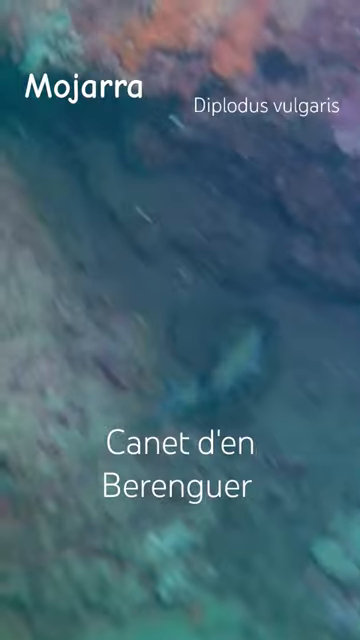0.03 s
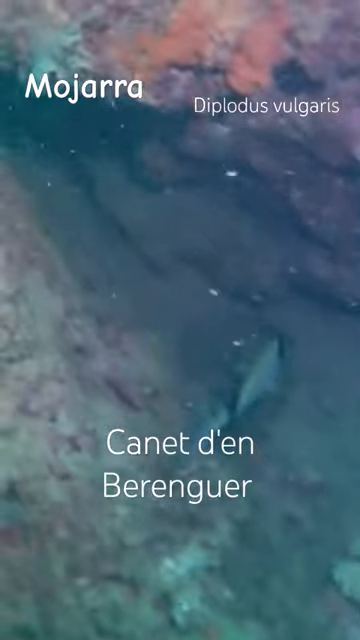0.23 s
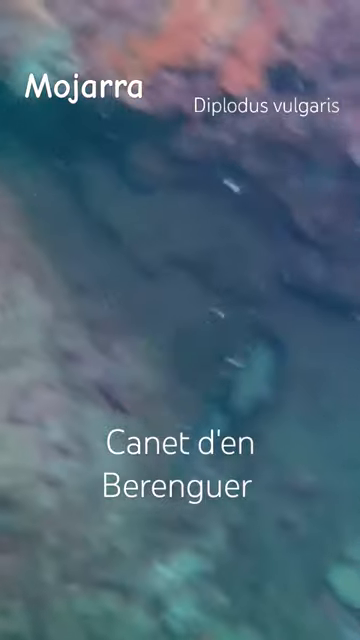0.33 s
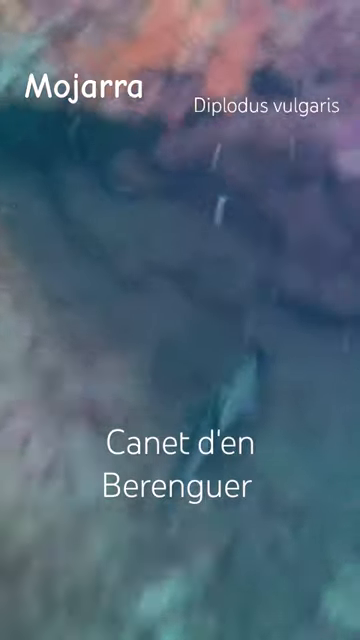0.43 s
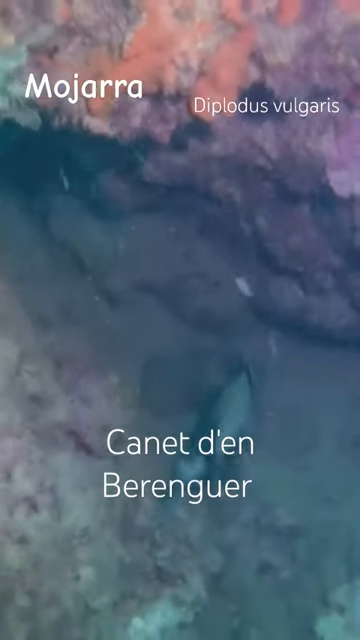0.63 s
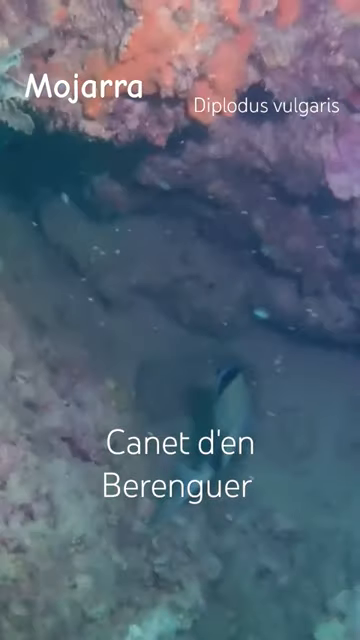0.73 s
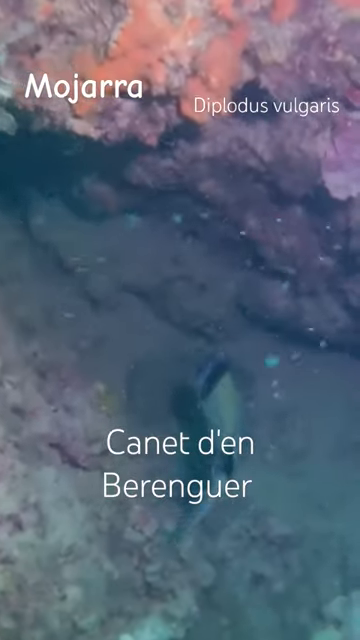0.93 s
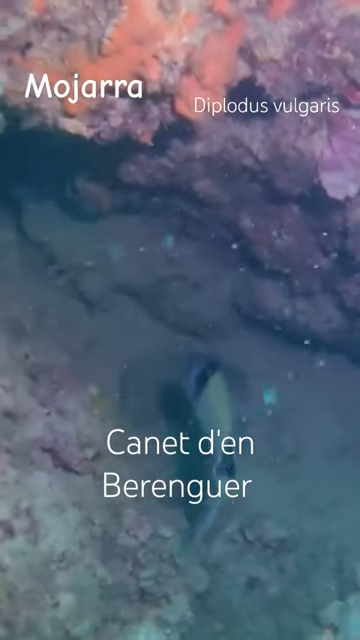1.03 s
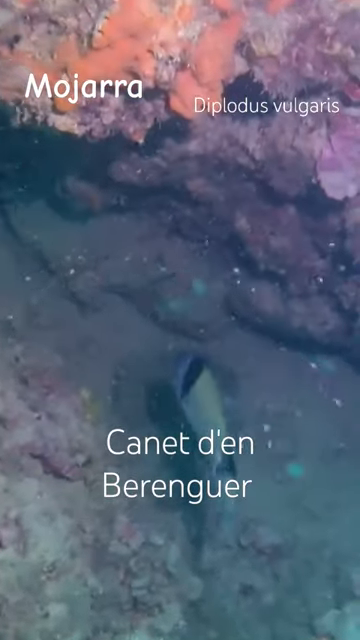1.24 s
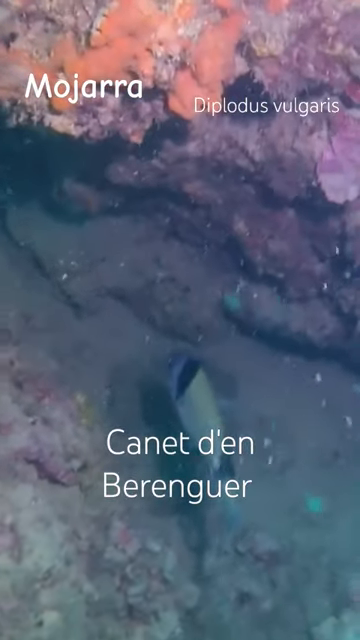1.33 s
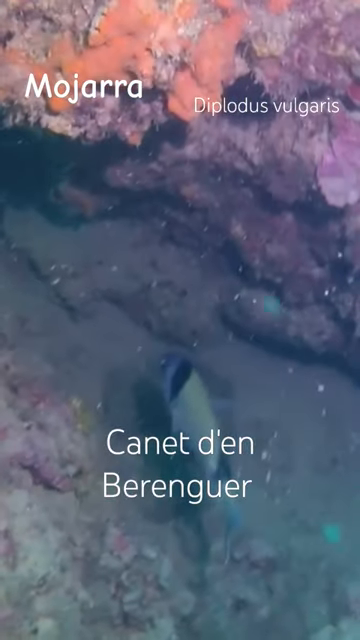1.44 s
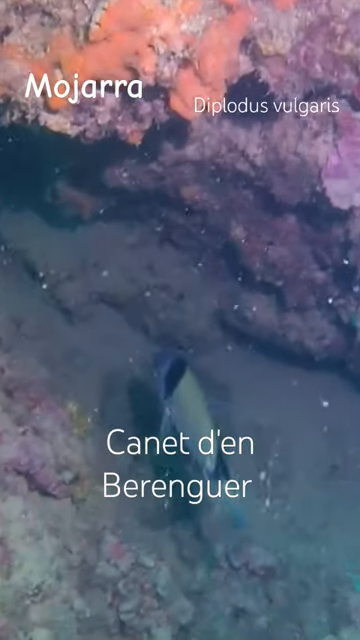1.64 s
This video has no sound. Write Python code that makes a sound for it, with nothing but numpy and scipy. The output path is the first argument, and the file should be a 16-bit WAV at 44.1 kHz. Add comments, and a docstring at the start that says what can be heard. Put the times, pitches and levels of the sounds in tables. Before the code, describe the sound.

Underwater rumble through a camera housing, microphone inside. Silence until 0.18 s, then a sharp click and a deep wavering hum, strongest near 0.5 s with a soft swish. Dull bumps and gurgles at 0.58 s, a bright bubble pop at 0.8 s. The hum fades over faint wash, distant crackle and even ticking; from 1.4 s bumps, gurgles and pops cluster, thinning toward the end.

```python
"""A small camera in a plastic housing is carried through sea water near rocks.
After a short silence the sound opens with a sharp click. The housing sways on its grip with a deep hum (a slow
sine), fingers bump it (short pushes), and water and distant reef crackle ring its shell (filtered noise and clicks).
Trapped air gurgles (wavering tones), small bubbles pop and ping beside the microphone (dying rings), and one soft
swish comes at half a second. Then something ticks faintly and evenly, and later bumps, gurgles and pops thicken again."""
import sys
import numpy as np
from scipy import signal
from scipy.io import wavfile
from scipy.ndimage import uniform_filter1d

SR = 44100
rng = np.random.default_rng(int(sys.argv[2]) if len(sys.argv) > 2 else 0)


def voltage_ratio(decibels):
    """Convert decibels (scalar or array-like) to amplitude ratios, 20 dB per decade."""
    exponent = np.asarray(decibels, float) / 20
    return 10 ** exponent


def dump(signal):
    """Clip the signal to [-1, 1] and save it as 16-bit WAV at the path in sys.argv[1]."""
    limited = np.clip(np.atleast_2d(signal).T, -1, 1)
    pcm = np.round(limited * 32767).astype(np.int16)
    wavfile.write(sys.argv[1], SR, pcm)


N = 74970  # length in samples
START_S = .1838  # silence before this, in seconds


def evened(x):
    """Scales a signal to an rms (average strength) of 1."""
    return x / np.sqrt(np.mean(x ** 2) + 1e-20)


def smoothed(x, span):
    """Averages twice over span samples, leaving only slow changes, and scales to rms 1."""
    once = uniform_filter1d(x, size=span)
    return evened(uniform_filter1d(once, size=span))


def over_time(rows, t):
    """Reads a curve drawn as (seconds, value) points."""
    return np.interp(t, *np.transpose(rows))


def over_hz(points, hz):
    """Reads a spectrum drawn as (Hz, dB) points, with pitch on a log axis."""
    f, value = np.transpose(points)
    return np.interp(np.log(hz + 1), np.log(f + 1), value, left=-90, right=-120)


def coloured(x, points):
    """Filters by a spectrum, with a response that only rings after its cause (minimum phase)."""
    hz = abs(np.fft.fftfreq(8192, 1 / SR))
    log_gain = np.log(voltage_ratio(over_hz(points, hz)))
    response = np.exp(np.conj(signal.hilbert(log_gain)))
    taps = np.fft.ifft(response).real[:4096]
    return signal.oaconvolve(x, taps)[:N]


def placed(rows, voice):
    """Makes one sound per table row and mixes each in at its own time."""
    mix = np.zeros(N)
    for row in rows:
        s, sound = voice(*row)
        part = mix[round(s * SR):][:len(sound)]
        part += sound[:len(part)]
    return mix


def sway(t):
    """The whole housing swings on its grip: a pure, low tone of changing pitch and level."""
    # Each row: time in seconds, level in dB rms.
    swing_level = [(.19, -15.5), (.23, -14), (.30, -19), (.385, -17.5), (.42, -32), (.45, -24),
                   (.50, -10.5), (.55, -17.5), (.61, -14), (.68, -21), (.74, -27), (.9, -32.5), (1.03, -43),
                   (1.098, -35), (1.4, -39.5), (1.55, -33.5), (1.7, -41)]
    # Each row: time in seconds, swing rate in Hz.
    swing_rate = [(.18, 30.9), (.39, 27.95), (.42, 36.4), (.465, 37.3), (.49, 22.3), (.54, 26.6),
                  (.57, 29.83), (.8, 29.74), (1.7, 28.66)]
    turns = np.cumsum(over_time(swing_rate, t) * (t >= START_S)) / SR
    return np.sqrt(2) * voltage_ratio(over_time(swing_level, t)) * np.cos(2 * np.pi * turns)


def bump(s, peak_db, width):
    """A push in one direction, with a shallow rebound on either side; the narrower, the sharper."""
    u = np.arange(-4 * width, 4 * width, 1 / SR) / width
    return s - 4 * width, voltage_ratio(peak_db) * (1 - 0.17 * u ** 2) * np.exp(-.5 * u ** 2)


def click_and_bumps():
    """A sharp click as the sound opens, then a few dull bumps on the housing."""
    # The first two rows make the click. Each row: time of the peak in seconds, peak level in dB, width in seconds.
    pushes = [(.1838, -24, 0.000047), (.1845, -24.5, 0.00023), (.582, -19, 0.0015), (.587, -18, 0.00085),
              (1.388, -20, 0.00037), (1.4105, -13, 0.00069)]
    return placed(pushes, bump)


def gurgle(s, peak_db, hz, length):
    """Trapped air wobbles: a short tone that starts fast, holds, wavers unevenly and dies."""
    wobble, lumpiness = .025, .15  # largest swing of the pitch and of the level, as fractions
    t = np.arange(0, length, 1 / SR)
    cycles = np.array([[1.3], [2.4]])  # per gurgle: pitch, then level
    waver, lumps = np.sin(2 * np.pi * (t / length * cycles + rng.random((2, 1))))
    shape = np.sin(np.pi * (t / length) ** 0.56) ** 0.49 * (1 + lumpiness * lumps)
    turns = np.cumsum(hz * (1 + wobble * waver)) / SR
    return s, voltage_ratio(peak_db) * shape * np.sin(2 * np.pi * turns)


def gurgles():
    """Pockets of trapped air sound at their own times as low wobbles."""
    # Each row: start in seconds, peak level in dB before the lumps, middle pitch in Hz, length in seconds.
    air_wobbles = [(.19, -39, 134, 0.073), (.218, -35, 1175, 0.0039), (.2185, -31.5, 718, 0.012),
                   (.577, -23.5, 463, 0.016), (.584, -26.5, 667, 0.0067), (.604, -34, 766, 0.0074),
                   (.765, -31.5, 165, 0.085), (.7805, -28, 737, 0.013), (.796, -22.5, 751, 0.016),
                   (1.30, -41, 168, 0.028), (1.502, -49, 1455, 0.042), (1.416, -35, 910, 0.0104),
                   (1.38, -29, 171, 0.032), (1.385, -29, 532, 0.008), (1.411, -33, 363, 0.038),
                   (1.412, -35, 830, 0.0052), (1.427, -24.5, 690, 0.0081), (1.437, -27, 820, 0.0072),
                   (1.435, -42.5, 1122, 0.026), (1.4895, -25, 785, 0.0139), (1.505, -31, 823, 0.032),
                   (1.6, -38.5, 275.8, 0.075), (1.604, -30.5, 825, 0.0047), (1.62, -37, 131, 0.24),
                   (1.661, -42.5, 810, 0.013), (1.675, -40, 759, 0.043), (1.683, -43.5, 1710, 0.014)]
    return placed(air_wobbles, gurgle)


def pop(s, start_db, hz, t60):
    """A bubble rings raggedly for a moment while its pitch climbs a little."""
    rise_per_s, rough, attack_s = 6., .55, .0007  # pitch rise as a fraction per second
    t = np.arange(0, min(t60, .1), 1 / SR)
    a, b = (smoothed(v, 36)[:len(t)] for v in rng.standard_normal((2, 4420)))
    angle = 2 * np.pi * hz * t * (1 + rise_per_s * t / 2)
    ring = (1 + rough * a) * np.sin(angle) + rough * b * np.cos(angle)
    attack = np.sin(np.pi / 2 * np.minimum(t / attack_s, 1)) ** 2
    return s, voltage_ratio(start_db - 60 * t / t60) * attack * ring  # 60 dB down after t60


def ticks():
    """Lists a faint, even tick close to the microphone: each tick is a few pops of the same pitches."""
    # The pitches that every tick rings, in Hz.
    tick_pitches = [2175, 2475, 2783]
    first_s, last_s, period_s = .738, 1.55, .0716
    level_db, spread_db, t60_s = -46, 2.5, .04  # pop settings; the spread is random
    rows = []
    for s in np.arange(first_s, last_s, period_s):
        for hz in tick_pitches:
            rows.append((s, level_db + spread_db * rng.standard_normal(), hz, t60_s))
    return rows


def pops_and_ticks():
    """Bubbles pop at the microphone port, which passes a narrow range of pitch poorly."""
    # Each row: start in seconds, level in dB before roughness, attack and port,
    # starting pitch in Hz, time to fall 60 dB in seconds.
    bubble_pops = [(.215, -39, 2665, 0.023), (.219, -45, 4060, 0.017), (0.247, -46, 4400, 0.0092),
                   (.584, -38, 1620, 0.024), (.604, -40, 2447, 0.038), (0.795, -19.5, 2600, 0.011),
                   (.7952, -29, 2000, .009), (0.7963, -20.5, 2823, .019), (0.904, -44, 2630, 0.03),
                   (0.945, -47, 2070, 0.066), (1.009, -40.5, 2660, 0.028), (1.388, -49, 2000, 0.017),
                   (1.408, -41, 2650, 0.03), (1.415, -37.5, 3610, 0.02), (1.427, -22, 2430, 0.0078),
                   (1.4382, -25, 2720, 0.015), (1.4382, -25.5, 3540, 0.0079), (1.445, -43, 2610, 0.016),
                   (1.452, -23, 2570, 0.0045), (1.459, -43, 2550, 0.014), (1.4894, -26.5, 1850, 0.019),
                   (1.4899, -23, 2600, 0.0048), (1.503, -36.5, 3550, 0.015)]
    dip_hz, dip_width_hz = 3170, 480
    sound = placed(list(bubble_pops) + ticks(), pop)
    return signal.lfilter(*signal.iirnotch(dip_hz, dip_hz / dip_width_hz, SR), sound)


def ping(s, peak_db, hz, snap_db):
    """A tiny bubble rings high and briefly, sagging in pitch, with a broad noisy snap."""
    t60_s, sag, snap_s = .011, .03, .0008  # snap_s: time for the snap to fall to about a third
    t = np.arange(0, .03, 1 / SR)
    angle = 2 * np.pi * hz * t * (1 - sag * t / t60_s)
    ring = voltage_ratio(peak_db - 60 * t / t60_s) * np.sin(angle)
    attack = np.minimum(t / 0.00009, 1)
    bright_noise = np.diff(rng.standard_normal(len(t) + 1))
    return s, attack * ring + bright_noise * np.exp(-t / snap_s) * voltage_ratio(snap_db)


def pings():
    """Tiny bubbles and snaps beside the microphone."""
    # Each row: start in seconds, level of the ring in dB before its attack, starting pitch in Hz,
    # gain of the snap noise in dB.
    tiny_bubbles = [(.2012, -49, 6960, -52), (.2466, -48, 6630, -54), (.308, -43.5, 6950, -50),
                    (.5937, -48, 5980, -51), (.6284, -44, 6800, -64), (.7082, -42.5, 7100, -57),
                    (.795, -48, 5770, -55), (1.3274, -47, 7200, -64), (1.503, -41.5, 5850, -66),
                    (1.5727, -50, 7300, -64), (1.6, -41, 7020, -54), (1.6476, -41.5, 6940, -57),
                    (1.6574, -41, 6930, -64), (1.6873, -37.5, 5770, -57)]
    return placed(tiny_bubbles, ping)


def swish(t):
    """A rush of water past the port: one soft swell of hiss."""
    # Each row: pitch in Hz, relative strength in dB per Hz.
    hiss_spectrum = [(700, -19), (1100, 0.5), (1650, 5.5), (2500, 2), (4800, -5.5), (5600, -48)]
    centre_s, half_width_s, level_db = 0.5014, 0.025, -44.5  # level: rms at the centre
    hiss = evened(coloured(rng.standard_normal(N), hiss_spectrum))
    return voltage_ratio(level_db) * hiss * np.exp(-.5 * ((t - centre_s) / half_width_s) ** 2)


def hollows():
    """Water keeps air spaces ringing: noise in narrow resonances that drift in pitch and swell."""
    # Each row: pitch in Hz, width in Hz of each of two equal filter stages, level in dB rms.
    air_spaces = [(165, 17.8, -49), (755.7, 42, -50)]
    drift_share, swell_db = .035, 2.5  # rms sizes of the slow changes
    span = round(.05 * SR)
    out = np.zeros(N)
    for hz, width_hz, db in air_spaces:
        drive, drift, swell = rng.standard_normal((3, N))
        drift, swell = smoothed(drift, span), smoothed(swell, span)
        turn = np.exp(2j * np.pi * np.cumsum(hz * (1 + drift_share * drift)) / SR)
        r = np.exp(-np.pi * width_hz / SR)
        # Shift the noise down to zero pitch, filter it there, then shift it back.
        narrow = signal.lfilter([1], np.convolve([1, -r], [1, -r]), drive / turn)
        ring = (turn * narrow).real
        out += voltage_ratio(db) * evened(ring * voltage_ratio(swell_db * swell))
    return out


def wash():
    """Moving water: noise with random patches in pitch and time, and an overall flicker."""
    patchy_db, flicker_db = 2, 1.5  # rms sizes
    a, b, patches = rng.standard_normal((N // 64 + 5, 129, 3)).T
    flicker = evened(uniform_filter1d(patches[0], size=4))
    patches = uniform_filter1d(patches, size=5, axis=0)  # smooth across pitch
    patches = evened(uniform_filter1d(patches, size=12, axis=1))  # and across time
    z = (a + 1j * b) * voltage_ratio(patchy_db * patches + flicker_db * flicker)
    return evened(signal.istft(z, nperseg=256, noverlap=192)[1][:N])


def crackle():
    """Distant reef crackle: single-sample clicks at random times, with sizes spread widely."""
    per_s, spread_db = 440, 6.5  # average rate; average random boost before its cap
    sizes = voltage_ratio(spread_db * np.minimum(rng.exponential(1, N), 4)) * rng.choice([-1, 1], N)
    return evened(sizes * (rng.random(N) < per_s / SR))


def fizz():
    """Far bubbles: short rings of scattered pitch, each kind on its own sparse random train."""
    low_hz, high_hz = 595, 11040
    per_s, cycles = 44, 7.8  # average rate of each kind; cycles until a ring falls to about a seventh
    out = np.zeros(N)
    for hz in np.geomspace(low_hz, high_hz, 24):
        turns = np.arange(0, 3 * cycles, hz / SR)
        ring = np.minimum(turns, 1) * np.exp(-turns * 2 / cycles) * np.sin(2 * np.pi * turns)
        ring *= np.sqrt(hz) / np.linalg.norm(ring)  # higher kinds carry more energy
        sizes = voltage_ratio(2.84 * np.minimum(rng.exponential(1, N), 3))
        train = sizes * (rng.random(N) < per_s / SR)
        out += signal.oaconvolve(train, ring)[:N]
    return evened(out)


def water(t):
    """Wash, crackle and far bubbles all ring the shell, which boosts some pitches and dulls others."""
    # Water as heard through the shell. Each row: pitch in Hz, relative strength in dB per Hz.
    shell = [(30, -25), (45, 7), (65, -7), (82, -5.5), (100, -7.5), (168, -12), (287, -19), (460, -21.5),
             (680, -20.5), (755, -15.5), (850, -21), (1000, -27.5), (1480, -37), (1650, -34), (2280, -31.5),
             (2800, -36), (3050, -42), (5100, -49), (5780, -46.5), (6300, -49.5), (7000, -45), (7700, -54),
             (10600, -56), (15200, -63.5)]
    # Strength of the water flow. Each row: time in seconds, level in dB rms.
    flow = [(.19, -36.5), (.35, -41), (.5, -34.5), (.7, -40.5), (1.36, -38.5), (1.42, -34), (1.48, -38),
            (1.7, -37.5)]
    outside = wash() + voltage_ratio(-10) * crackle() + voltage_ratio(-10.5) * fizz()
    return voltage_ratio(over_time(flow, t)) * evened(coloured(outside, shell))


def scene():
    """Sums the layers; the steady ones open at the start time over a few milliseconds."""
    t = np.arange(N) / SR
    opening = np.clip((t - START_S) / 0.0038, 0, 1)
    mix = (sway(t) + swish(t) + hollows() + water(t)) * opening
    mix += click_and_bumps() + gurgles() + pops_and_ticks() + pings()
    return mix[None]  # one channel


def roll_off(x):
    """The treble ends steeply here."""
    return signal.sosfilt(signal.butter(12, 15400, fs=SR, output="sos"), x)


def record(dry):
    """Turns the finished mix into the sound that is written out."""
    return roll_off(dry)


dry = scene()
out = record(dry)
dump(out)
```